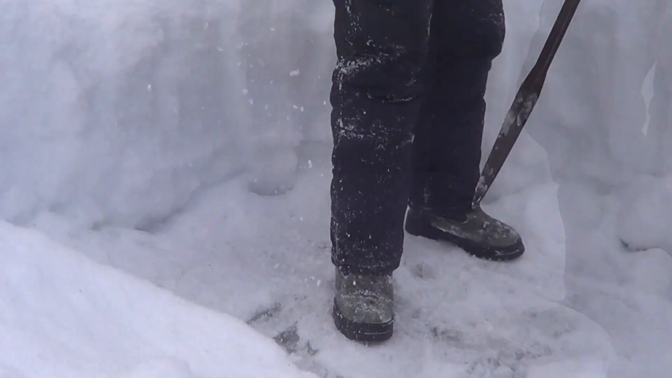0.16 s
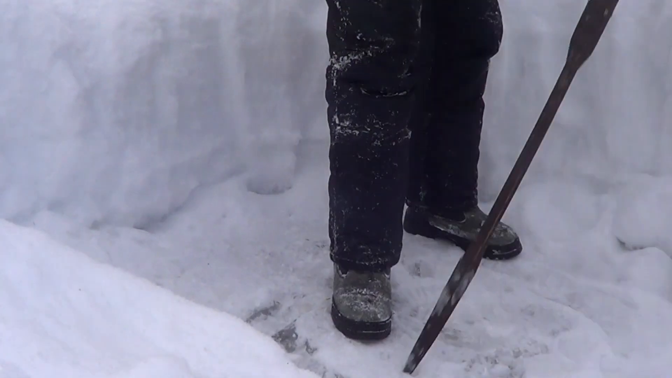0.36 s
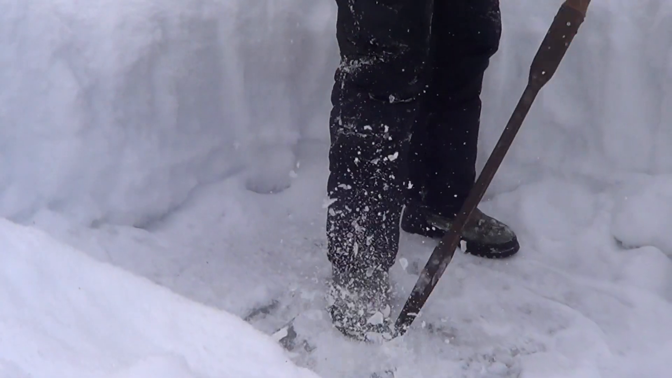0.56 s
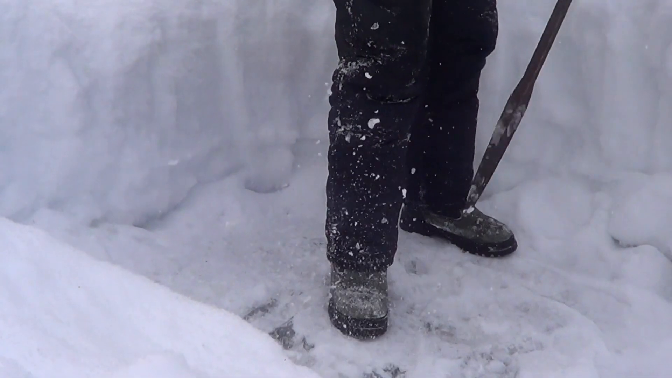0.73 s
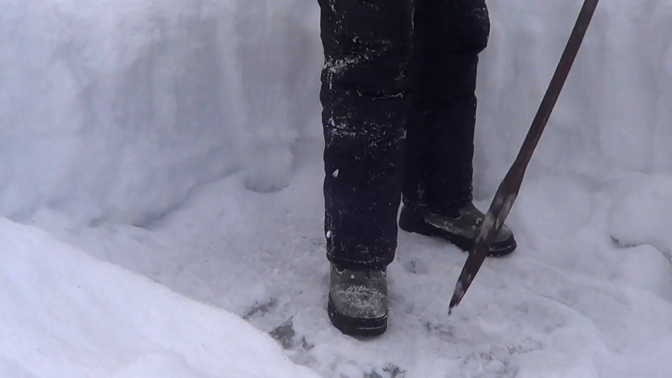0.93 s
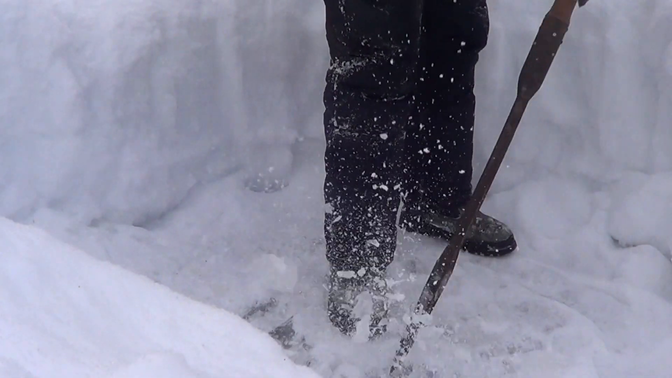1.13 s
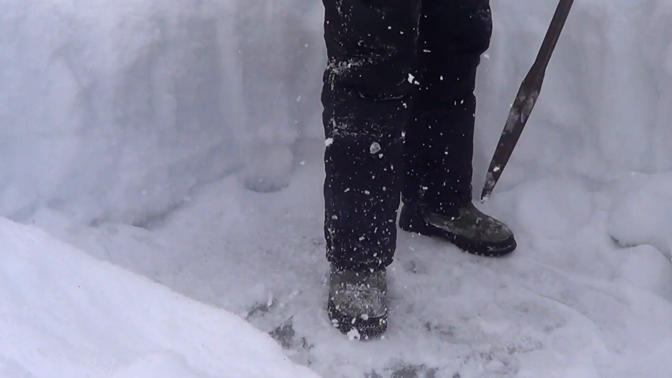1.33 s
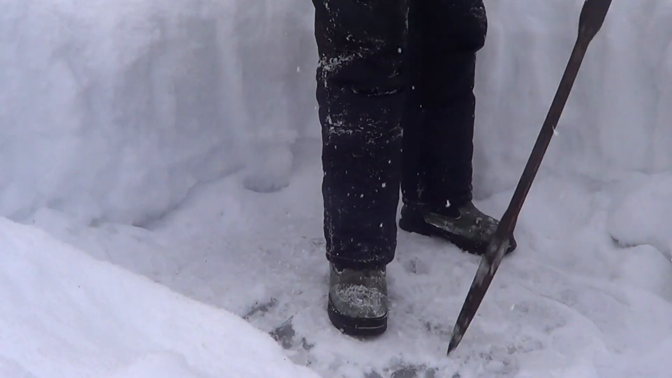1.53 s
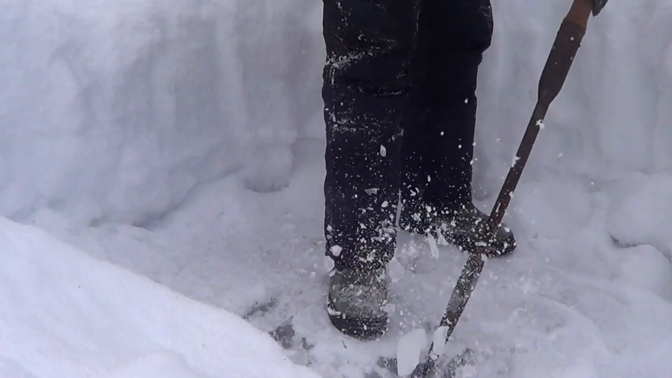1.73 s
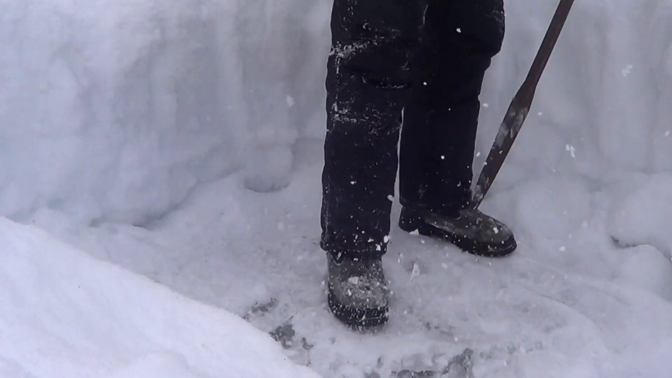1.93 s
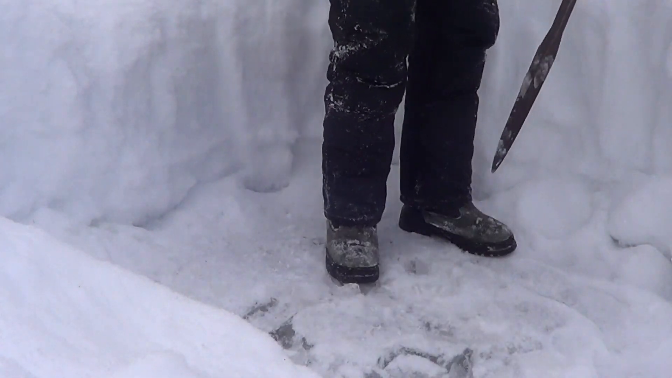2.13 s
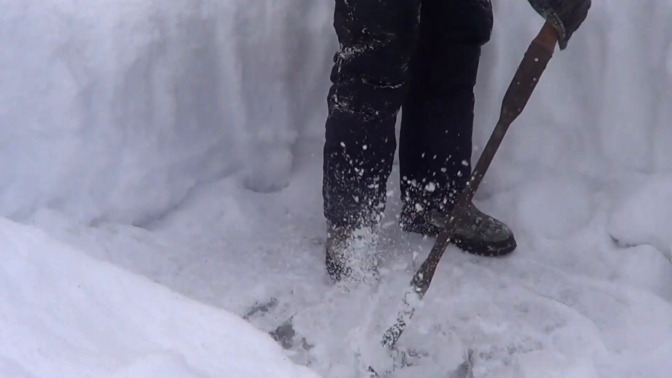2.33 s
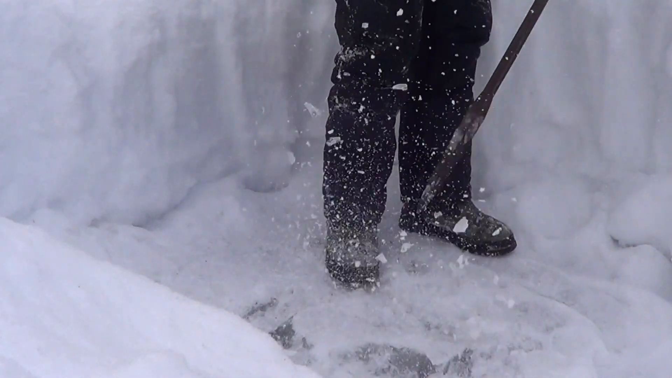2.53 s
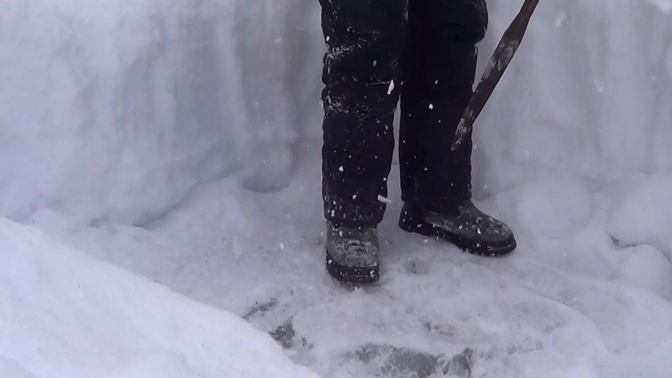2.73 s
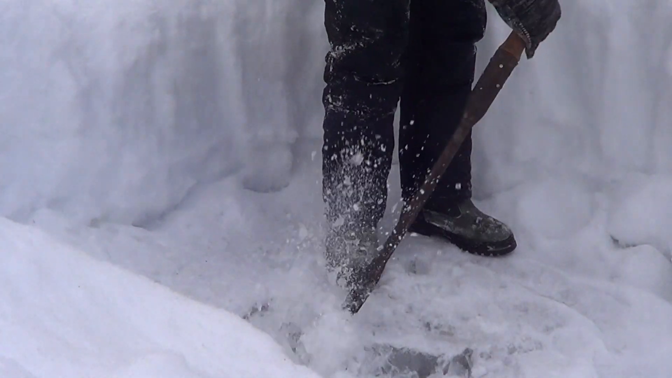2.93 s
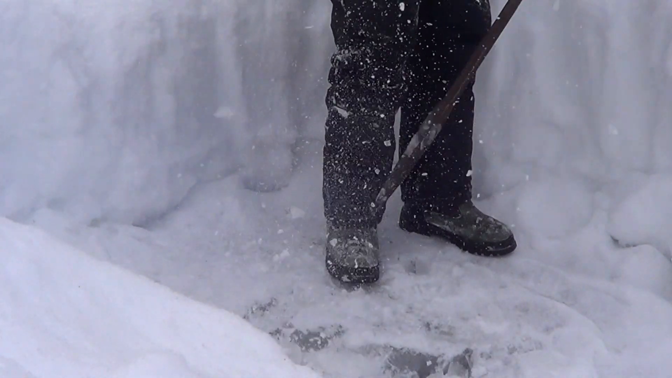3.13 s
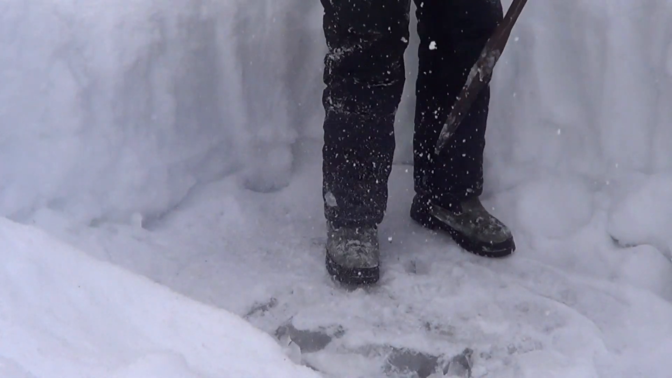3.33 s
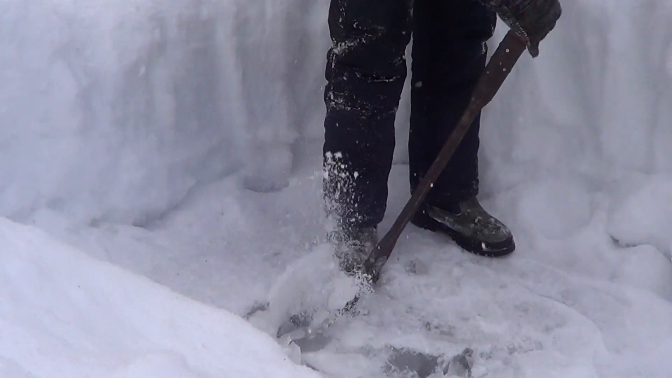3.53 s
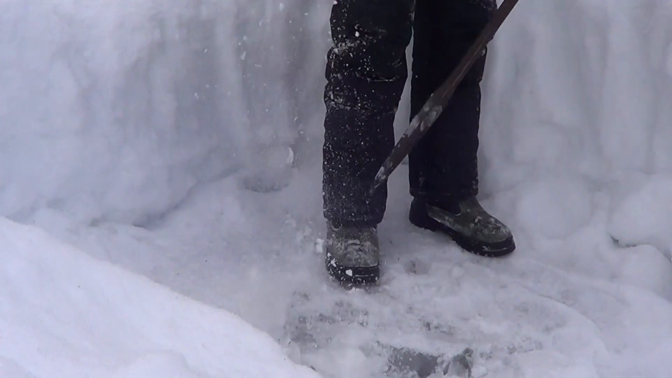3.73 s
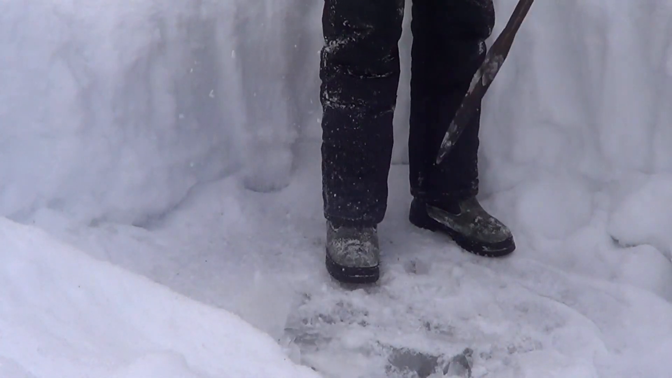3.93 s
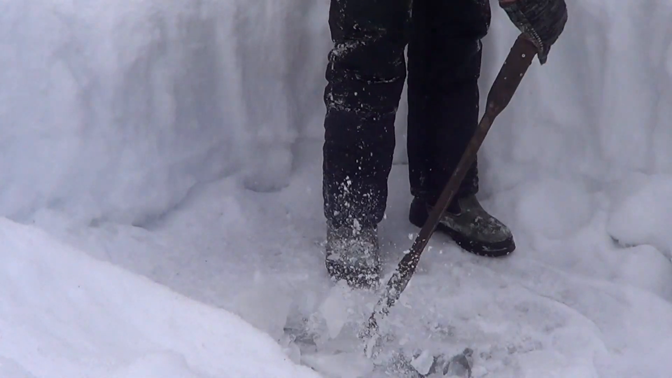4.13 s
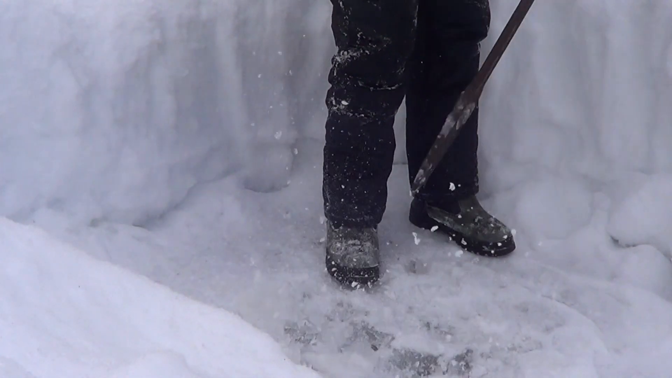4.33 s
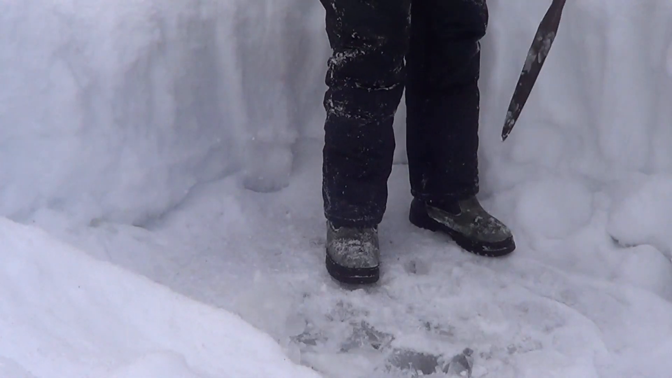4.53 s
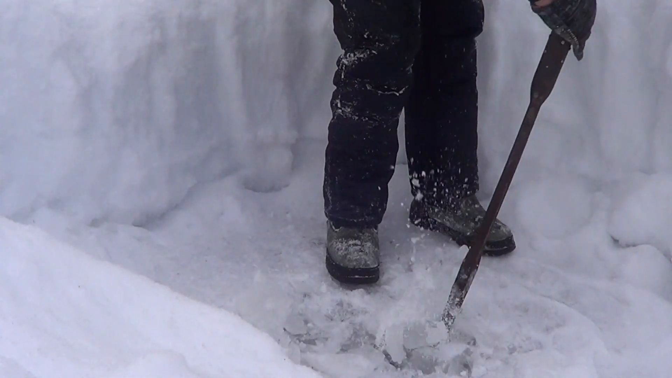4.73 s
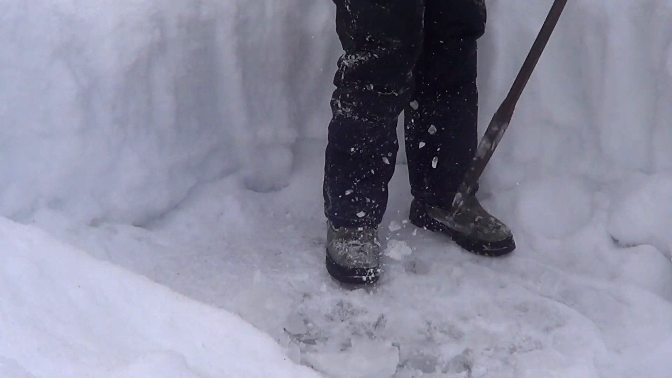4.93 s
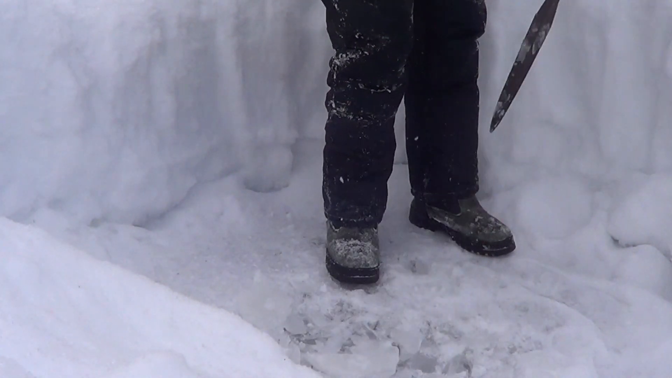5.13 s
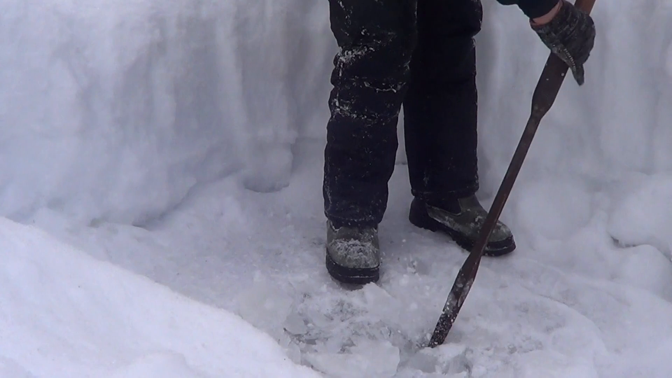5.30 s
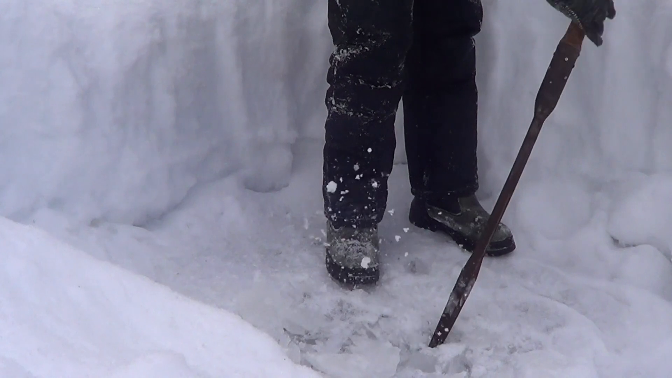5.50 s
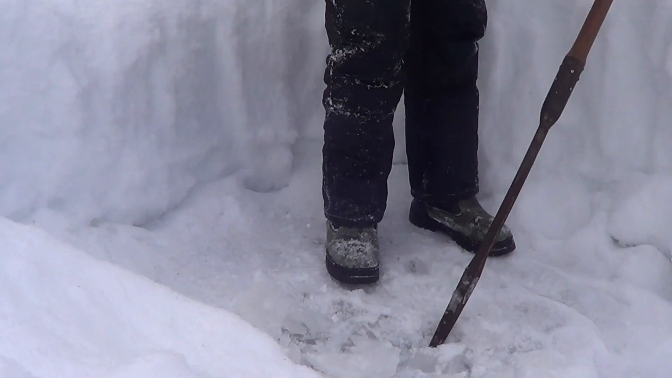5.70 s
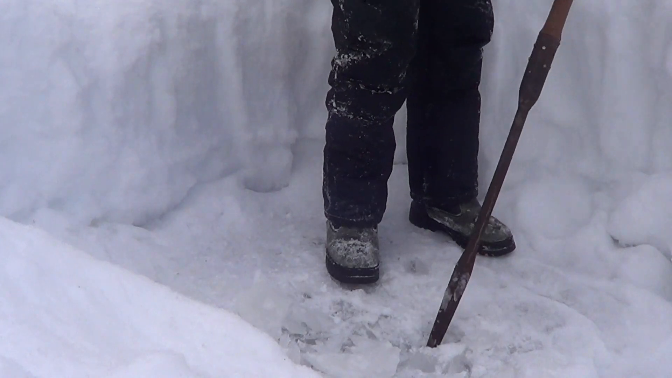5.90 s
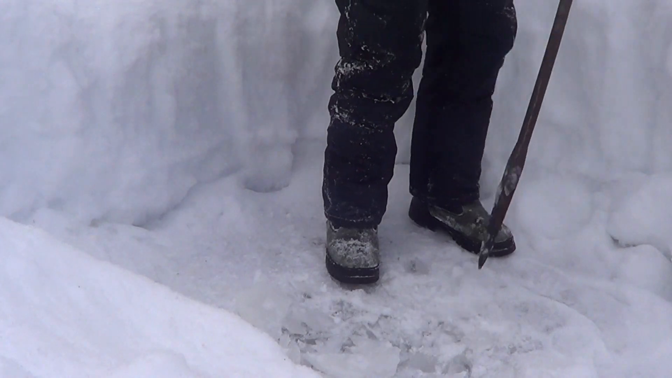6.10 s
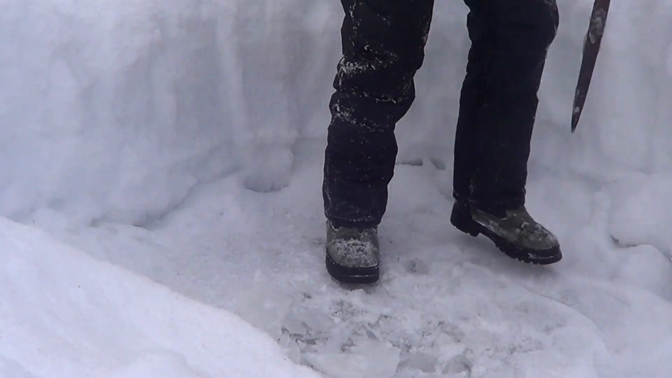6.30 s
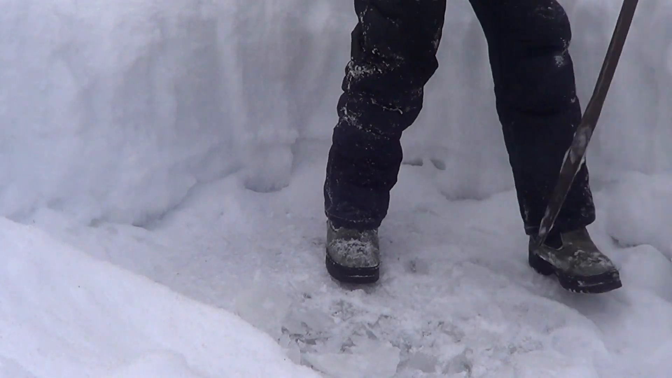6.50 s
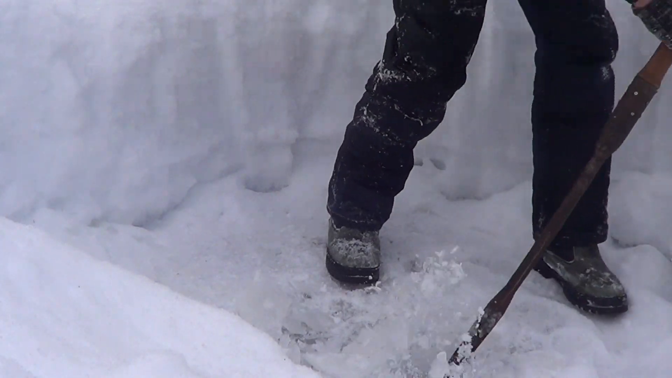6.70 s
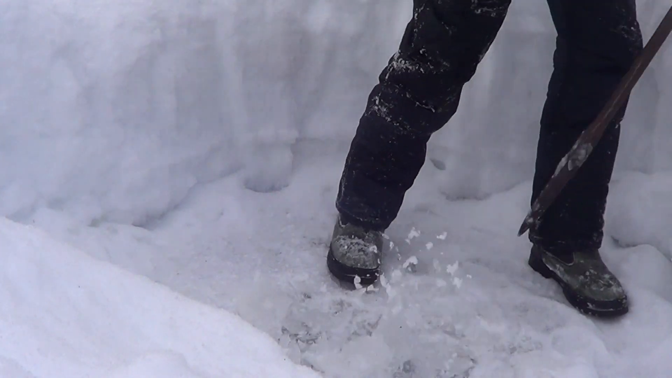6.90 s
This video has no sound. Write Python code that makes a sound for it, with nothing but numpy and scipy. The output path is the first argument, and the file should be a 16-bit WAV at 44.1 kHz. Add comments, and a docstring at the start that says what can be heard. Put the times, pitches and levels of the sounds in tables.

```python
"""A low gust and a light rain of ice chips come first; then a steel chisel chops river ice ten times in a snow pit.
Each blow is a burst of tiny fractures (filtered random clicks) with a faint shaft ring and a thump of sheet modes.
Debris is random clicks exciting short rings; sharp clinks of larger chips, and of the chisel set down or scraping
on the ice, are repeated contacts on glassy modes. Snow clods, boots and cloth are shaped clicks and noise;
snow walls scatter the sound and outdoor air lies under it."""
import sys
import numpy as np
from scipy import signal
from scipy.fft import rfft, irfft
from scipy.io import wavfile
from scipy.ndimage import uniform_filter1d

SR = 44100
rng = np.random.default_rng(int(sys.argv[2]) if len(sys.argv) > 2 else 0)


def unload_wav(signal):
    """Save mono or channel-first audio to the path in sys.argv[1] as 16-bit WAV at rate SR, clipped to [-1, 1]."""
    wavfile.write(
        sys.argv[1],
        SR,
        np.round(np.clip(np.atleast_2d(signal).T, -1, 1) * 32767).astype(np.int16),
    )


N = 311116
TIME = np.arange(N) / SR


def amp(db):
    """Decibel definition: level to amplitude ratio."""
    return 10 ** (np.asarray(db) / 20)


def evened(x):
    """Normalization to unit root-mean-square."""
    return x / np.sqrt(np.mean(x ** 2) + 1e-20)


def read(points, hz):
    """Interpolation of a spectrum along a logarithmic frequency axis."""
    frequency, value = np.transpose(points)
    return np.interp(np.log(hz + 1), np.log(frequency), value)


def level(curve):
    """Amplitude envelope: gain over time from (time [s], level [dB])."""
    return amp(np.interp(TIME, *np.transpose(curve)))


def add(mix, s, sound):
    """Superposition: a sound joins the mix at its start time."""
    part = mix[max(round(s * SR), 0):][:len(sound)]
    part += sound[:len(part)]


def colour(x, points, size=2048):
    """Minimum-phase filtering: causal, so nothing sounds ahead of a click."""
    log_gain = np.log(amp(read(points, abs(np.fft.fftfreq(size, 1 / SR)))))
    response = np.exp(np.conj(signal.hilbert(log_gain)))
    taps = np.fft.ifft(response).real
    return signal.fftconvolve(x, taps[:size // 2])[:len(x)]


def spread_over(x, seconds):
    """Energy normalization: a burst gets the energy of a unit sound lasting that long."""
    return x / np.sqrt(np.sum(x ** 2) / (seconds * SR) + 1e-20)


def clicks(count, per_s, spread_db, cap=3.07):
    """Random impulse train: clicks of either sign, many small and a few large."""
    sizes = amp(spread_db * np.minimum(rng.exponential(1, count), cap))
    signs = rng.choice([-1., 1.], count)
    return sizes * signs * (rng.random(count) < per_s / SR)


def ring(hz, t60, t):
    """Free damped vibration: one mode falls 60 dB in t60 seconds."""
    return np.sin(2 * np.pi * hz * t) * np.exp(-np.log(1000) * t / t60)


# how unevenly the blade sticks and slips: rms of the level jitter
JERK_DB = 3.5


def fracture(t, travel, per_s, spread_db, rise, release, bite_db, fade_db):
    """Stick-slip fracture: tiny breaks come in jerks, hardest at the first bite, changing as the blade slows."""
    moving = (1 - np.exp(-t / rise)) * np.exp(-np.maximum(t - travel, 0) / release)
    slowing = amp(fade_db * np.minimum(t / travel, 1))
    jerks = evened(uniform_filter1d(rng.standard_normal(len(t)), size=110))
    bite = 1 + amp(bite_db) * np.exp(-t / .004)
    return clicks(len(t), per_s, spread_db) * moving * slowing * amp(JERK_DB * jerks) * bite


# chisel blows: (time [s], blade travel [s], crushing [dB], cracking [dB], splintering [dB],
# thump delay [s], thump [dB], shaft ring [dB], sprayed crumbs [dB], sprayed lumps [dB])
CHISEL_BLOWS = [(0.4319, 0.033, -28, -22.5, -20.5, .008, -17, -51, -37, -36.5),
                (1.0154, 0.043, -23.5, -21.5, -22, .046, -22, -52, -32.5, -34),
                (1.597, .034, -26.5, -21, -18.5, .0318, -15.5, -52, -37, -38),
                (2.2905, .024, -25.5, -18.5, -18, .0235, -17.5, -51, -35, -35),
                (2.9, 0.031, -25.5, -19, -22, .0365, -16, -55, -33, -30),
                (3.496, 0.025, -30, -28.5, -17.5, .009, -16.5, -54, -34.5, -38),
                (4.0867, 0.026, -27, -20, -19.5, .026, -22, -48, -35.5, -37.5),
                (4.7073, 0.015, -26.5, -18, -18.5, .01, -18.5, -53, -49, -29.5),
                (5.3123, 0.02, -24.5, -19, -18, .018, -14.5, -48, -34.5, -32),
                (6.643, 0.024, -37, -29, -18, .026, -23.5, -62, -32, -38)]
# spectra of three sizes of fracture, large to small: (frequency [Hz], relative density [dB per Hz])
CRUSH_SPECTRUM = [(40, -34), (120, -5), (280, -4.5), (700, 0), (830, -7.5), (1050, -3.5), (1400, -27),
                  (3000, -84)]
CRACK_SPECTRUM = [(600, -21), (1250, -2), (1550, 1.5), (2050, -2), (2400, 3), (2800, -7), (3300, 0.5),
                  (4300, -8.5), (7000, -22)]
SPLINTER_SPECTRUM = [(2500, -14), (4600, -10.5), (5600, -7), (6400, -1), (7200, -7.5), (9300, -5),
                     (11500, -12.5), (15500, -17.5)]
# nominal modes of the ice sheet: (frequency [Hz], relative level [dB], t60 [s])
SHEET_MODES = [(49.4, -22, .2), (75, -22, 0.31), (128.7, -18.5, 0.28), (176, -45, 0.24), (207, -49, 0.17),
               (339.6, -12.5, 0.14)]
# nominal modes of the steel shaft: (frequency [Hz], relative level [dB], t60 [s])
SHAFT_MODES = [(1020, -12, .12), (1680, -17, 0.11), (2345, 15, 0.8), (2390, 17, 0.49), (2490, 8, 0.4),
               (3100, 14, 0.34), (3451, -8, .25), (6600, 2, .12)]
# shudder that spreads through the sheet: (frequency [Hz], relative density [dB per Hz])
SHUDDER_SPECTRUM = [(30, -46), (80, -9), (130, 10.5), (200, -2), (320, -9), (600, -14.5), (1500, -32)]


def chisel(shaft_spread_db=3, push_s=0.0021, rebound=0.36, sheet_spread=0.06, modes_db=-3,
           shudder_db=-17, shudder_t60=0.22):
    """Modal excitation: the blade's fractures ring the shaft; where it jams, it shoves the ice sheet."""
    out, t = np.zeros(N), np.arange(SR // 2) / SR
    u = t / push_s
    # one half-wave of push, then a weaker one back
    shove = np.sin(np.pi * u) * ((u < 1) + rebound * ((u >= 1) & (u < 2)))
    for s, travel, crush_db, crack_db, splinter_db, delay, thump_db, shaft_db, *_ in CHISEL_BLOWS:
        crush_breaks = fracture(t, travel, 2500, 6.6, rise=0.0037, release=0.0074, bite_db=-14, fade_db=-2)
        crack_breaks = fracture(t, travel, 2200, 2.0, rise=0.0016, release=0.0043, bite_db=-9, fade_db=-4.0)
        splinter_breaks = fracture(t, travel, 4500, 2.8, rise=0.00008, release=0.0053, bite_db=-8, fade_db=0)
        crush = colour(crush_breaks, CRUSH_SPECTRUM)
        crack = colour(crack_breaks, CRACK_SPECTRUM)
        splinter = colour(splinter_breaks, SPLINTER_SPECTRUM)
        for db, layer in (crush_db, crush), (crack_db, crack), (splinter_db, splinter):
            add(out, s, amp(db) * spread_over(layer, travel))
        # the grip changes from blow to blow and damps the shaft's modes unevenly
        shaft = sum(amp(db + shaft_spread_db * rng.standard_normal()) * ring(hz, t60 * rng.uniform(0.35, 1.5), t)
                    for hz, db, t60 in SHAFT_MODES)
        shaft_ring = signal.fftconvolve(evened(crack) + evened(splinter), shaft)
        add(out, s, amp(shaft_db) * spread_over(shaft_ring, 1 / 10))
        # every blow lands on another spot, so the sheet answers a little differently
        sheet = sum(amp(db) * ring(hz * (1 + sheet_spread * rng.uniform(-1.28, 1)), t60, t)
                    for hz, db, t60 in SHEET_MODES)
        shudder_noise = evened(colour(rng.standard_normal(len(t)), SHUDDER_SPECTRUM))
        shudder = shudder_noise * amp(shudder_db - 60 * t / shudder_t60)
        add(out, s + delay, amp(thump_db) * (shove + amp(modes_db) * sheet + shudder))
    return out


# debris sprays out as the blade bites and thins out quickly; heavy lumps stop first
SPRAY_RISE_S, CRUMBS_FADE_DB_PER_S, LUMPS_FADE_DB_PER_S = 0.0062, 27, 57.5
SHOWER_TAIL = 0.76  # time a shower takes to die away, as a share of its build-up
SHOWER_SHAPE = 2.08  # 1 = pointed, 2 = bell-shaped
# a few crumbs keep trickling until the work pauses
TRICKLE_CRUMBS_DB, TRICKLE_LUMPS_DB = -45, -52
PAUSE_S, PAUSE_FADE_S = 5.8, 0.033
# debris thrown high rains back: (thickest at [s], build-up [s], crumbs [dB], lumps [dB])
DEBRIS_SHOWERS = [(.12, 0.15, -34.5, -39), (.78, 0.16, -35.5, -42), (1.41, 0.1, -33.5, -41.5),
                  (2.098, 0.16, -32, -37.5), (2.5, 0.19, -37.5, -46), (2.72, 0.14, -42, -51),
                  (3.25, 0.089, -32, -40.5), (3.78, 0.26, -35.5, -45), (4.43, 0.16, -33.5, -40.5),
                  (4.86, 0.069, -30, -33.5), (4.944, .04, -32.5, -41), (5.11, 0.36, -39.5, -56),
                  (5.755, 0.066, -38.5, -43.5), (6.81, 0.076, -34, -36), (6.98, 0.28, -36.5, -42.5)]


def debris_flow():
    """Addition of incoherent powers: gain of (crumbs, lumps) from blow sprays, showers and a thin trickle."""
    trickle = amp([[TRICKLE_CRUMBS_DB], [TRICKLE_LUMPS_DB]])
    power = trickle ** 2 * np.exp(-np.maximum(TIME - PAUSE_S, 0) / PAUSE_FADE_S)
    fade = np.array([[CRUMBS_FADE_DB_PER_S], [LUMPS_FADE_DB_PER_S]])
    for s, *_, crumbs_db, lumps_db in CHISEL_BLOWS:
        age = np.maximum(TIME - s, 0)
        spray = amp([[crumbs_db], [lumps_db]] - fade * age) * np.minimum(age / SPRAY_RISE_S, 1)
        power += spray ** 2
    for s, build_up, crumbs_db, lumps_db in DEBRIS_SHOWERS:
        away = np.maximum(s - TIME, (TIME - s) / SHOWER_TAIL) / build_up
        shower = amp([[crumbs_db], [lumps_db]]) * np.exp(-away ** SHOWER_SHAPE)
        power += shower ** 2
    return np.sqrt(power)


# spectra of fine debris (also a clink's tick) and coarse debris: (frequency [Hz], relative density [dB per Hz])
FINE_SPECTRUM = [(1500, -36.5), (3600, -10), (5000, -9.5), (6500, -2), (8000, -1.5), (9700, 1.5),
                 (11500, -3.5), (15500, -9)]
COARSE_SPECTRUM = [(40, -26), (150, -2.5), (320, 0.5), (520, -3.5), (900, 0.5), (1600, 3), (2400, 2.5),
                   (3000, 4.5), (3900, 7.5), (5200, -11), (9000, -15.5)]


def debris(flow, grain_t60=0.0026, tick_db=-4, fine_db=-1.0, coarse_db=-5, count=28):
    """Granular impact noise: crumbs tinkle at pitches set by size; lumps patter with a tick and a dull pat."""
    grains_per_s, lumps_per_s, size_spread_db, clump_db = 4500, 1500, 3.9, 2.3
    t = np.arange(SR // 50) / SR
    # debris lands in handfuls
    clumps = amp(clump_db * evened(uniform_filter1d(rng.standard_normal(N), size=520)))
    crumbs = np.zeros(N)
    for hz in np.geomspace(4200, 15000, count):
        landings = clumps * clicks(N, grains_per_s / count, size_spread_db)
        crumbs += signal.oaconvolve(landings, ring(hz, grain_t60, t))[:N]
    lumps = clumps * clicks(N, lumps_per_s, size_spread_db)
    fine = evened(colour(evened(crumbs) + amp(tick_db) * evened(lumps), FINE_SPECTRUM))
    coarse = evened(colour(lumps, COARSE_SPECTRUM))
    return amp(fine_db) * fine * flow[0] + amp(coarse_db) * coarse * flow[1]


# spectrum of the knock under a clink: (frequency [Hz], relative density [dB per Hz])
KNOCK_SPECTRUM = [(80, -29), (350, -0.5), (900, 2), (1600, 14.5), (2500, 11.5), (4000, 19.5), (5500, -1.5),
                  (10000, 3)]


def ice_contact(clink_db, hz, knock_db, rattle, ring_cycles, overtone_db=-10, undertone_db=-12, rebound=0.57,
                scuff_db=-30, count=3):
    """Repeated impact on a damped resonator: a tick, a few rebounds, a short glassy clink and a knock."""
    t = np.arange(SR // 25) / SR
    span_s, tick_db = .008, -2
    contacts = amp(scuff_db) * rng.standard_normal(len(t)) * np.exp(-t / (rattle + 0.0033))
    contacts[0] += 1
    later = np.clip(rng.uniform(0.23, 1.1, count) * rattle * SR, 1, len(t) - 1).astype(int)
    contacts[later] += rebound * rng.uniform(0.66, 1.0, count) * rng.choice([-1, 1], count)
    above = min(hz * rng.uniform(1.15, 1.45), SR / 2)
    below = hz * rng.uniform(0.668, 0.71)
    # ice loses the same share each cycle, so high pitches die soonest
    modes = sum(amp(db) * ring(f, ring_cycles / f, t)
                for f, db in [(hz, 0), (above, overtone_db), (below, undertone_db)])
    glassy = evened(signal.fftconvolve(contacts, modes)[:len(t)])
    clink = glassy + amp(tick_db) * evened(colour(contacts, FINE_SPECTRUM))
    knock = colour(contacts, KNOCK_SPECTRUM)
    return amp(clink_db) * spread_over(clink, span_s) + amp(knock_db) * spread_over(knock, span_s)


# sharp clinks: larger chips landing, and the chisel set down or scraping on the ice
# (about 5.40, 5.45, 5.59 s): (time [s], clink [dB], pitch [Hz], knock [dB], rattle time [s])
SHARP_CLINKS = [(0.047, -28, 6830, -49, 0.0039), (.6475, -34, 9300, -44, 0.0022),
                (0.8448, -29.5, 9100, -61, .0033), (1.002, -30, 8000, -48, 0.002),
                (1.3178, -25, 10900, -46, 0.0038), (1.378, -37, 11600, -36, 0.0062),
                (1.435, -27, 7060, -28, 0.0061), (1.9407, -29.5, 8500, -60, .001),
                (1.9764, -32, 9200, -33, 0.008), (2.0847, -22, 9860, -48, 0.0027),
                (2.2715, -31, 5430, -37, 0.0026), (2.435, -21.5, 9840, -52, .0017),
                (2.4951, -29, 6960, -31, 0.0066), (2.5373, -17.5, 5940, -64, 0.0062),
                (2.6936, -29.5, 9900, -50, 0.0068), (2.8706, -24, 10800, -51, .0007),
                (2.8895, -29, 5400, -56, .0016), (3.2112, -20.5, 8100, -60, 0.0028),
                (3.336, -25, 9800, -55, 0.001), (3.3666, -31, 9300, -53, 0.0047),
                (3.428, -24.5, 6300, -48, 0.0046), (3.6128, -27.5, 5630, -56, .0015),
                (3.7062, -24, 7200, -59, 0.0038), (3.759, -28.5, 3670, -25.5, 0.0031),
                (4.006, -27, 6870, -38, .0015), (4.0657, -32, 5230, -43, 0.001),
                (4.2358, -19.5, 7100, -32, .0022), (4.2684, -28.5, 5670, -60, .0018),
                (4.3266, -29.5, 12800, -45, 0.0031), (4.5505, -24, 10700, -59, 0.0024),
                (4.8331, -24.5, 6470, -46, 0.0049), (5.0579, -22, 8200, -59, 0.003),
                (5.1025, -27, 7460, -33, 0.0029), (5.121, -22.5, 10200, -55, .008),
                (5.2073, -29.5, 12100, -56, 0.0017), (5.3831, -25.5, 7600, -33, 0.0033),
                (5.403, -27.5, 2380, -43, 0.0034), (5.4454, -30.5, 6750, -36, .0017),
                (5.5894, -23, 5880, -26, .0032), (5.6585, -26, 7500, -31, 0.0073),
                (6.693, -27, 6900, -41, .004), (6.8062, -25, 10000, -45, 0.0042),
                (6.9087, -23, 9750, -44, 0.0022)]


def sharp_clinks(ring_cycles=50):
    """Superposed impacts: larger chips landing, and the chisel set down or scraping on the ice."""
    out = np.zeros(N)
    for s, *contact in SHARP_CLINKS:
        add(out, s, ice_contact(*contact, ring_cycles))
    return out


def small_chips(flow, clink_db=4.0, knock_db=-4, typical_hz=9000, spread_octaves=0.29, count=190):
    """Random arrivals: dry ticks, more of them and louder where the debris is thicker."""
    spread_db, rattle_s, ring_cycles, thickest_db = 2.5, .0012, 36, -32
    out, flow_db = np.zeros(N), 20 * np.log10(flow + 1e-9)
    for at in rng.integers(0, N, count):
        lands = rng.random() < amp(flow_db[0, at] - thickest_db)
        crumbs_db, lumps_db = flow_db[:, at] + spread_db * rng.standard_normal(2)
        hz = typical_hz * 2 ** (spread_octaves * rng.standard_normal())
        rattle = rattle_s * rng.uniform(0.41, 3.2)
        tick = ice_contact(crumbs_db + clink_db, hz, lumps_db + knock_db, rattle, ring_cycles)
        add(out, at / SR, lands * tick)
    return out


# clods of snow dropping with a soft pat: (time [s], level [dB])
SNOW_CLODS = [(0.701, -40), (2.207, -39), (3.121, -45), (3.352, -40.5), (3.826, -35.5), (4.174, -40.5),
              (6.022, -46.5), (6.614, -28), (6.838, -45)]
# spectrum of the pat: (frequency [Hz], relative density [dB per Hz])
PAT_SPECTRUM = [(100, -17.5), (400, 0), (950, 3), (1800, -7), (6000, -15.5)]


def clods(crumble_s=0.0019):
    """Inelastic impact: soft snow lands as a decaying noise puff without a ring."""
    out, t = np.zeros(N), np.arange(SR // 20) / SR
    for s, db in SNOW_CLODS:
        puff = colour(rng.standard_normal(len(t)) * np.exp(-t / crumble_s), PAT_SPECTRUM)
        add(out, s, amp(db) * spread_over(puff, 0.0087))
    return out


# boots pressing packed snow: (time [s], length [s], level [dB])
BOOT_STEPS = [(2.087, 0.077, -36.5), (6.572, 0.074, -40.5), (6.649, 0.037, -31.5), (6.685, 0.056, -30),
              (6.811, 0.054, -46.5)]
# spectrum of the pressed snow: (frequency [Hz], relative density [dB per Hz])
BOOT_SPECTRUM = [(30, -45), (80, -7), (160, -3), (320, 5), (600, -2.5), (1300, -5.5), (3500, -18.5)]
# clothes sliding as the weight shifts: (time [s], level [dB])
CLOTH_RUSTLE = [(6.18, -59), (6.25, -48), (6.42, -47.5), (6.49, -49.5), (6.54, -40.5), (6.6, -35),
                (6.66, -48)]
# spectrum of the cloth: (frequency [Hz], relative density [dB per Hz])
CLOTH_SPECTRUM = [(150, -12), (700, -1), (1600, -6), (4600, -4), (6200, 1), (8500, 4.5), (11000, -3),
                  (15500, -9)]


def worker():
    """Granular compaction and friction: packed snow gives way in small jerks; trouser cloth swishes."""
    out = evened(colour(rng.standard_normal(N), CLOTH_SPECTRUM)) * level(CLOTH_RUSTLE)
    t = np.arange(SR // 5) / SR
    for s, length, db in BOOT_STEPS:
        press = np.sin(np.pi * np.minimum(t / length, 1))
        crunch = colour(clicks(len(t), 1400, 6.5) * press, BOOT_SPECTRUM)
        add(out, s, amp(db) * spread_over(crunch, length))
    return out


# strength of the scatter from the snow walls: (frequency [Hz], gain [dB])
WALL_SCATTER = [(80, -29.5), (500, -25), (2500, -34), (7000, -22.5), (14000, -31)]
# left minus right of the middle signal: (frequency [Hz], level difference [dB])
LEFT_RIGHT_BALANCE = [(60, -.4), (250, -.9), (700, -2), (1400, -1.6), (2800, -3), (5000, -1.3), (9000, -.7),
                      (14000, -.1)]


def snow_pit(x, side_db=0, t60=0.24, tail_db=-20, tail_t60=0.051):
    """Diffuse reflection: soft snow walls return a faint, short scatter, part of it from the sides."""
    t, hz = np.arange(SR // 6) / SR, np.fft.rfftfreq(N, 1 / SR)
    sideways = clicks(len(t), 3600, 0.89) * (t > .0005) * amp(-60 * t / t60)
    ahead = clicks(len(t), 3000, 0.53) * (t > .004) * amp(-60 * t / tail_t60)
    middle = x + amp(tail_db) * signal.oaconvolve(x, ahead / np.linalg.norm(ahead))[:N]
    from_sides = signal.oaconvolve(x, sideways / np.linalg.norm(sideways))[:N]
    side = amp(side_db) * colour(from_sides, WALL_SCATTER)
    lean = amp(read(LEFT_RIGHT_BALANCE, hz) / 2)
    leaning = irfft(rfft(middle) * np.array([lean, 1 / lean]), N)
    return leaning + np.array([side, -side])


def scattered(x, width=0.019):
    """Intensity panning: the place wanders, so each contact sounds a little left or right."""
    place = width * evened(uniform_filter1d(rng.standard_normal(N), size=1500))
    return snow_pit(x) + np.array([place * x, -place * x])


AIR_DB = -52.5
# spectra of still outdoor air, its wide part, and wind: (frequency [Hz], relative density [dB per Hz])
AIR_SPECTRUM = [(20, -0.5), (130, -4.5), (300, 4.5), (650, 0), (1100, -3.5), (2200, -2.5), (4500, -6),
                (6500, -9), (9000, -25), (12000, -19), (15500, -8.5)]
AIR_WIDE_SPECTRUM = [(20, -9), (130, -2), (330, 7.5), (1000, 7.5), (2200, -2.5), (5000, -6.5), (14000, -21)]
WIND_SPECTRUM = [(20, 6.5), (60, -1.5), (115, 3), (220, -7.5), (400, -21), (1000, -55)]
# wind on the microphone: (time [s], level [dB])
WIND_GUST = [(0, -36), (.13, -40.5), (.24, -49), (.32, -39), (.42, -48), (.55, -47.5), (.7, -54.5),
             (.95, -85)]


def outdoors(wide_db=-57, gust_wide_db=-8):
    """Diffuse field and turbulence: quiet air all round, and a low gust that buffets two ports unequally."""
    spectra = AIR_SPECTRUM, AIR_WIDE_SPECTRUM, WIND_SPECTRUM, WIND_SPECTRUM
    air, wide, gust, buffet = (evened(colour(rng.standard_normal(N), points)) for points in spectra)
    middle = amp(AIR_DB) * air + gust * level(WIND_GUST)
    side = amp(wide_db) * wide + amp(gust_wide_db) * buffet * level(WIND_GUST)
    return np.array([middle + side, middle - side])


def scene(blows_side_db=8.0):
    """Superposition: blows and boots in the pit, clinks and debris around them, open air over all."""
    flow = debris_flow()
    blows = snow_pit(chisel(), side_db=blows_side_db)
    clinks_and_debris = scattered(sharp_clinks() + small_chips(flow) + debris(flow))
    return blows + clinks_and_debris + snow_pit(clods() + worker()) + outdoors()


EDGE_HZ, WHINE_HZ = 15900, 15625  # upper band limit, pitch of the whine


def record(dry, whine_db=-58, low_cut_hz=45):
    """Band limiting and soft saturation: a camera thins deep bass, adds a faint whine and rounds high peaks."""
    ceiling = .9
    low_cut = signal.butter(3, low_cut_hz, "high", fs=SR, output="sos")
    thinned = signal.sosfilt(low_cut, dry)
    whine = amp(whine_db) * np.sin(2 * np.pi * TIME * WHINE_HZ)
    rounded = ceiling * np.tanh((thinned + whine) / ceiling)
    high_cut = signal.firwin(511, EDGE_HZ, window=("kaiser", 8), fs=SR)
    return signal.oaconvolve(rounded, high_cut[None], "same")


dry = scene()
out = record(dry)
unload_wav(out)
```